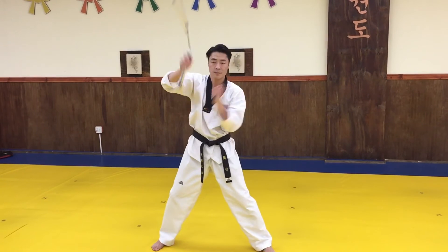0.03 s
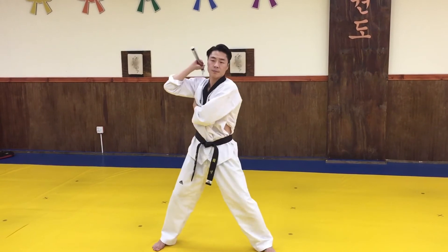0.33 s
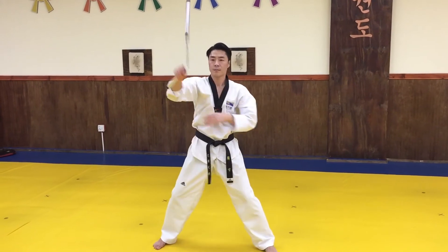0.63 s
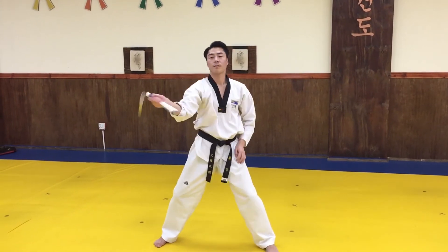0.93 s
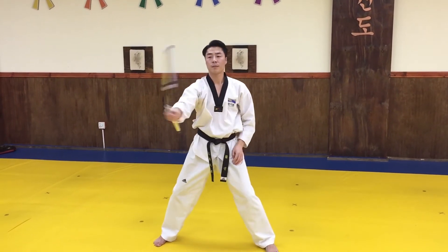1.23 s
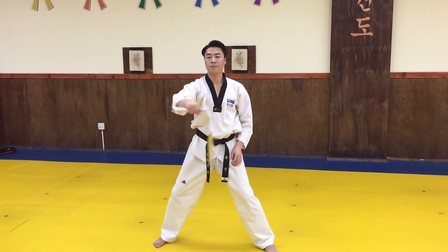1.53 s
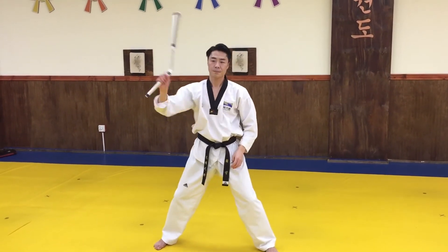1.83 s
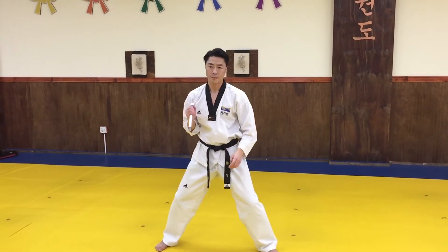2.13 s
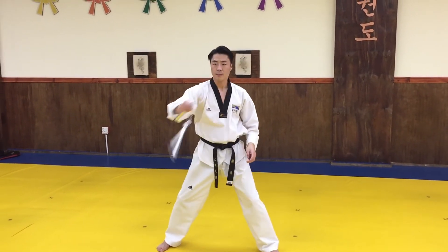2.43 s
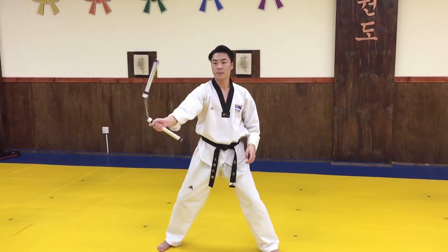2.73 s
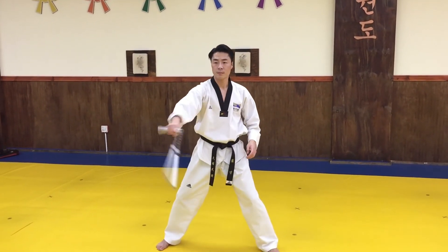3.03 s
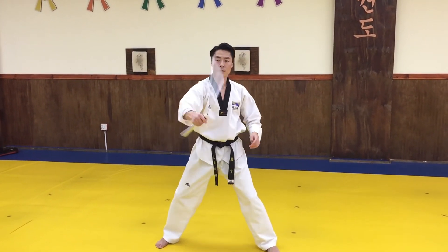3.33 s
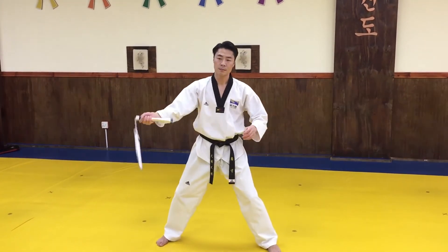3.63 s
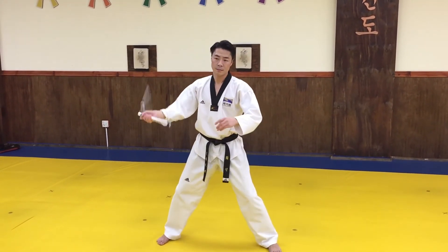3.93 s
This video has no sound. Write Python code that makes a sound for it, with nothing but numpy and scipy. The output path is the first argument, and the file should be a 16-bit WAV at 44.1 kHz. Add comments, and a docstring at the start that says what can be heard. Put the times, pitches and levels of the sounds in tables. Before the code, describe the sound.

The steel chain of swinging nunchucks rattles and clinks, with soft whooshes of air.

```python
"""Chained sticks in a training hall

Two hollow sticks joined by a steel chain are swung and spun close to one microphone. The links jingle
and snap taut against the swivel caps, and air across the flying stick hoots softly on each turn.
Twice it is caught against the uniform; cloth flaps, feet shift on the mat, and farther off
the hall answers over a low rumble."""
import sys
import numpy as np
from scipy import signal
from scipy.fft import rfft, irfft, next_fast_len
from scipy.io import wavfile
from scipy.ndimage import map_coordinates

SR = 44100
rng = np.random.default_rng(int(sys.argv[2]) if len(sys.argv) > 2 else 0)


def wrap_up_sound(samples):
    """Save the sound to the file named by the first command line argument, as 16-bit audio."""
    columns = np.atleast_2d(samples).T
    # keep every value between -1 and 1, then stretch to whole-number steps
    tamed = np.clip(columns, -1, 1)
    steps = np.round(tamed * 32767).astype(np.int16)
    wavfile.write(sys.argv[1], SR, steps)


N = 4 * SR

# the chain pulls taut: start_s, high_mode_hz, low_mode_db, high_mode_db, cap_clack_db
JERKS = [(0.001, 11710, -29, -28, -17), (0.005, 12060, -28, -28, -18), (0.071, 12330, -29, -29, -29),
         (0.125, 11570, -26, -23, -30), (0.131, 11560, -31, -25, -34), (0.308, 12060, -30, -25, -33),
         (0.737, 11900, -38, -38, -32), (0.767, 11440, -33, -30, -25), (0.774, 11510, -31, -26, -35),
         (0.848, 11600, -35, -28, -32), (0.859, 12000, -24, -33, -36), (0.948, 11570, -30, -22, -36),
         (1.163, 11520, -25, -33, -25), (1.172, 11630, -21, -24, -29), (1.183, 11610, -22, -27, -29),
         (1.198, 11540, -19, -16, -27), (1.23, 12230, -24, -29, -33), (1.393, 11630, -30, -21, -33),
         (1.409, 12200, -23, -26, -18), (1.6, 11570, -33, -24, -35), (1.715, 12100, -23, -30, -26),
         (1.808, 11490, -27, -29, -37), (2.007, 11560, -36, -30, -41), (2.036, 11730, -31, -31, -30),
         (2.059, 12170, -32, -32, -20), (2.243, 12000, -51, -47, -38), (2.286, 11900, -48, -40, -34),
         (2.435, 11800, -30, -33, -31), (2.44, 12000, -28, -29, -21), (2.51, 12200, -26, -27, -23),
         (2.615, 11760, -31, -37, -26), (2.686, 12300, -21, -30, -22), (2.723, 12300, -29, -26, -22),
         (2.88, 12100, -20, -26, -25), (2.913, 12270, -26, -24, -27), (2.964, 12100, -28, -28, -27),
         (3.059, 12420, -26, -28, -28), (3.075, 12060, -23, -31, -28), (3.1, 12440, -26, -22, -31),
         (3.213, 11710, -30, -29, -31), (3.301, 12380, -31, -22, -31), (3.332, 12170, -33, -28, -33),
         (3.395, 11620, -28, -25, -34), (3.45, 12210, -26, -29, -23), (3.458, 12300, -29, -24, -34),
         (3.497, 12020, -30, -31, -26), (3.526, 12250, -30, -26, -37), (3.631, 11520, -35, -35, -28),
         (3.7, 12120, -28, -26, -34), (3.744, 12190, -32, -29, -34), (3.87, 12200, -30, -35, -33),
         (3.964, 11700, -33, -40, -31)]
# both ends of a link's pitch range as it shifts in the chain: low_mode_hz, high_mode_hz
LINK_RANGE = [(4205, 11540), (4510, 12400)]
# spectrum of stick and swivel cap under a contact: frequency_hz, level_db
CAP_SPECTRUM = [(300, -41.5), (1300, -14), (2700, -16.5), (3700, -3), (4400, -7), (4850, 5), (5600, 1.5),
                (6350, 6.5), (7100, -2), (7950, 4), (9600, -2), (10400, -7.5), (11000, -1), (12900, 2),
                (14000, 3.5), (15700, -7)]


def amp(db):
    """Decibels to gain."""
    return 10 ** (np.asarray(db) / 20)


def unit(x):
    """Scale to rms 1."""
    return x / np.sqrt(np.mean(x ** 2) + 1e-20)


def along(points, hz):
    """Read a curve of (frequency_hz, value) points on a log frequency axis."""
    point_hz, values = np.transpose(points)
    return np.interp(np.log(hz + 1), np.log(point_hz + 1), values)


def colour(x, spectrum):
    """Causal filter with the given spectrum; white noise keeps its power."""
    size = 2 * next_fast_len(N // 2 + SR // 4)
    gain = unit(amp(along(spectrum, np.fft.rfftfreq(size, 1 / SR))))
    cepstrum = irfft(np.log(gain))
    cepstrum[1:size // 2] *= 2  # fold to minimum phase
    cepstrum[size // 2 + 1:] = 0
    return irfft(rfft(x, size) * np.exp(rfft(cepstrum)))[:N]


def add(track, start_s, sound):
    """Mix a sound in at a time."""
    part = track[max(0, int(start_s * SR)):][:len(sound)]
    part += sound[:len(part)]


def fade(t, t60):
    """Exponential decay, 60 dB down at t60."""
    return np.exp(-np.log(1000) * t / t60)


def chatter(t, rise_s):
    """Strength of one contact: the metal bites, peaks at rise_s and lets go."""
    u = t / rise_s
    return u * np.exp(1 - u)


def effort(moves):
    """Level that rises and falls in a bell curve with each movement."""
    t = np.arange(N) / SR
    return sum(amp(db) * np.exp(-.5 * ((t - peak_s) / width_s) ** 2) for peak_s, db, width_s in moves)


def swells(moves, spectrum):
    """Coloured noise that follows the movements."""
    return effort(moves) * colour(rng.standard_normal(N), spectrum)


def ring(t, hz):
    """A metal mode driven by one chattering contact; rms 1 over its first 300 samples."""
    phase = 2 * np.pi * hz * t
    slip_rad = 0.2 * np.cumsum(rng.standard_normal(len(t)))
    drive = chatter(t, rise_s=0.0013) * np.sin(phase + slip_rad)
    mode = signal.fftconvolve(drive, np.sin(phase) * fade(t, t60=0.022))[:len(t)]
    return mode / np.sqrt(np.mean(mode[:300] ** 2))


def contacts(per_s, spread_db):
    """Irregular small contacts: a time, a size and two spare random values for each."""
    contact_rng = np.random.default_rng(rng.integers(2 ** 31))
    jitter, strength, *spare = contact_rng.standard_normal((int(per_s * N / SR), 4)).T
    times = (np.arange(len(jitter)) + jitter) / per_s
    return zip(times, amp(spread_db * np.clip(strength, -2, 2)), *spare)


def ticks(spread_db):
    """A dense train of short dry ticks, rms 1."""
    t, power = np.arange(SR // 20) / SR, np.zeros(N)
    for start_s, size, _, _ in contacts(per_s=250, spread_db=spread_db):
        add(power, start_s, (size * chatter(t, rise_s=0.0022)) ** 2)
    return unit(np.sqrt(power) * rng.standard_normal(N))


def room_tone():
    """The hall's steady low rumble, with a faint hiss on top."""
    # background noise: frequency_hz, level_db
    spectrum = [(18, -16), (40, -7.5), (80, 6.5), (130, -5), (200, -10.5), (400, -18), (1000, -41),
                (4000, -19), (15000, -17.5)]
    return amp(-55) * colour(rng.standard_normal(N), spectrum)


def rattle():
    """Loose links and swivels ring, tick on the caps and scrape; link pitch drifts from jerk to jerk."""
    # loudness of the loose chain: time_s, jingle_db, scrape_db
    levels = [(0, -26, -44.5), (0.09, -27, -48), (0.199, -37, -55.5), (0.295, -37.5, -49),
              (0.33, -25.5, -62), (0.45, -38, -48), (0.57, -44.5, -60), (0.671, -28.5, -53),
              (0.76, -33, -47), (0.83, -34.5, -55.5), (0.87, -30.5, -55), (0.93, -38, -64.5),
              (1.0, -27.5, -44.5), (1.08, -39, -57.5), (1.155, -45, -64), (1.178, -23, -41),
              (1.26, -25.5, -48.5), (1.35, -37, -46.5), (1.44, -27.5, -43.5), (1.53, -39, -57),
              (1.62, -28.5, -48.5), (1.77, -30.5, -52.5), (1.83, -31.5, -45), (1.95, -40.5, -63),
              (2.0, -31.5, -53), (2.08, -32, -47), (2.19, -43.5, -53), (2.33, -45, -58),
              (2.405, -45.5, -59.5), (2.44, -25.5, -43.5), (2.6, -31.5, -46.5), (2.74, -26, -46.5),
              (2.83, -29, -47), (2.91, -24.5, -46.5), (3.1, -27.5, -44.5), (3.25, -27.5, -45.5),
              (3.52, -31, -50.5), (3.61, -38, -52.5), (3.66, -24.5, -46.5), (3.76, -28, -43),
              (3.81, -36.5, -49), (3.9, -30, -47.5), (4.0, -33.5, -46)]
    # links scraping on the stick: frequency_hz, level_db
    scrape_spectrum = [(20, -40), (150, -5.5), (750, -24.5), (1080, -0.5), (1300, -10.5), (1660, 12),
                       (1850, 5.5), (2100, 5.5), (2700, -1), (3400, 6), (9000, -20)]
    settle_s, scatter_hz, swivel_hz, detune = 0.0194, 320, 5163, 0.018
    t = np.arange(SR // 20) / SR
    low, high, swivel = np.zeros((3, N))
    low_range, high_range = np.transpose(LINK_RANGE)
    jerk_s, jerk_hz, *_ = np.transpose(JERKS)
    for k, (start_s, size, scatter, tilt) in enumerate(contacts(per_s=300, spread_db=3.5)):
        high_hz = np.interp(start_s - settle_s, jerk_s, jerk_hz) + scatter_hz * scatter
        high_hz = high_range[0] + abs(high_hz - high_range[0])  # reflect off the bottom of the range
        low_hz = np.interp(high_hz, high_range, low_range) * (1 + detune * rng.standard_normal())
        add(low, start_s, size * amp(2 * tilt) * ring(t, low_hz))
        add(high, start_s, size * amp(-2 * tilt) * ring(t, high_hz))
        if k % 2:
            add(swivel, start_s, size * ring(t, swivel_hz * (1 + detune * tilt)))
    times, *curves_db = np.transpose(levels)
    jingle_gain, scrape_gain = [amp(np.interp(np.arange(N) / SR, times, db)) for db in curves_db]
    brightness = unit(jingle_gain) ** 0.17  # gentle contacts sound duller
    metal = amp(-6) * (unit(low) + brightness * unit(high)) + amp(-14) * unit(swivel)
    cap_ticks = amp(-5.5) * colour(ticks(spread_db=5), CAP_SPECTRUM)
    scrape = amp(1) * colour(ticks(spread_db=6), scrape_spectrum)
    return jingle_gain * (metal + cap_ticks) + scrape_gain * scrape


def jerks():
    """The chain snaps taut: a cap clacks, one link rings out and sometimes the swivel too."""
    # a swivel cap rings on the hardest jerks: start_s, pitch_hz, level_db
    clinks = [(.002, 5256, -21), (1.409, 5000, -22), (1.41, 6020, -25), (1.716, 5150, -27),
              (3.45, 5230, -25)]
    t = np.arange(SR // 20) / SR
    rings, clacks = np.zeros((2, N))
    low_range, high_range = np.transpose(LINK_RANGE)
    for start_s, high_hz, low_db, high_db, clack_db in JERKS:
        low_hz = np.interp(high_hz, high_range, low_range)
        add(rings, start_s, amp(low_db - .5) * ring(t, low_hz))
        add(rings, start_s, amp(high_db + .5) * ring(t, high_hz))
        add(clacks, start_s, amp(clack_db + 3) * chatter(t, rise_s=.0016) * rng.standard_normal(len(t)))
    for start_s, hz, db in clinks:
        add(rings, start_s, amp(db) * ring(t, hz))
    return rings + colour(clacks, CAP_SPECTRUM)


def hoot():
    """Air across the hollow stick sounds a thin, wavering tone that rises with speed, in a soft whoosh."""
    # passes of the flying stick: peak_s, level_db, width_s
    swings = [(.01, -45.5, 0.043), (.75, -54.5, 0.0669), (.97, -47.5, 0.053), (1.14, -49, 0.019),
              (1.28, -53, 0.069), (1.5, -48.5, 0.046), (1.73, -46, 0.062), (1.95, -46.5, 0.0448),
              (2.54, -51, 0.0304), (2.69, -55, 0.0545), (2.89, -47, 0.05), (3.08, -45, 0.03),
              (3.3, -49, 0.023), (3.385, -47, 0.02216), (3.47, -50, 0.035), (3.69, -46, 0.03),
              (3.89, -50, 0.06)]
    # breath of the hollow stick: frequency_hz, level_db
    spectrum = [(20, -73), (200, -52.5), (440, -15), (528, 1.5), (640, -17.5), (950, -28.5), (1070, -9),
                (1160, -38), (2000, -38)]
    centre_hz, rise_hz, waver_hz, wavers_per_s = 529, 29.84, 10, 40
    waver = map_coordinates(rng.standard_normal(N // 100), [np.arange(N) * wavers_per_s / SR])
    speed = effort(swings)
    hz = centre_hz + rise_hz * (speed / speed.max() - .5) + waver_hz * waver
    tone = np.sqrt(2) * np.sin(2 * np.pi * np.cumsum(hz) / SR)
    return amp(-5.5) * speed * tone + amp(-4) * swells(swings, spectrum)


def snaps():
    """Steel strikes steel: a short burst of pure treble."""
    # bright snaps of the chain: start_s, level_db
    strikes = [(.126, -16), (.593, -27), (.768, -18), (1.198, -16), (1.411, -15), (1.717, -14),
               (2.286, -24), (2.44, -16), (2.512, -18), (2.724, -17), (3.101, -17), (3.157, -22),
               (3.214, -15), (3.365, -22), (3.451, -15), (3.745, -17)]
    t, bursts = np.arange(SR // 20) / SR, np.zeros(N)
    for start_s, db in strikes:
        add(bursts, start_s, amp(db) * fade(t, t60=0.03) * rng.standard_normal(len(t)))
    return signal.sosfilt(signal.butter(2, 11000, "high", fs=SR, output="sos"), bursts)


def catches():
    """The stick is caught with a soft slap that dies in the cloth."""
    # stick landing on the uniform: start_s, level_db, t60_s
    landings = [(0.306, -42.5, 0.28), (2.037, -30, 0.17), (2.059, -32.5, 0.32)]
    # slap on cloth: frequency_hz, level_db
    spectrum = [(30, -22), (70, -6), (330, -8.5), (900, -8), (1620, -4), (2800, -12), (14000, -14)]
    t, slaps = np.arange(SR // 2) / SR, np.zeros(N)
    for start_s, db, t60 in landings:
        add(slaps, start_s, amp(db) * fade(t, t60) * rng.standard_normal(len(t)))
    return colour(slaps, spectrum)


def uniform_flaps():
    """The uniform flaps in low, soft puffs."""
    # flaps: peak_s, level_db, width_s
    flaps = [(.34, -52.5, 0.023), (.52, -58.5, 0.13), (3.45, -59, 0.11)]
    # moving cloth: frequency_hz, level_db
    spectrum = [(180, -31), (245, 24), (340, 6.5), (600, -2), (2000, -50)]
    return swells(flaps, spectrum)


def sleeve_slides():
    """The stick rubs along the sleeve with a narrow hiss."""
    # slides: peak_s, level_db, width_s
    slides = [(.385, -36, 0.044), (.86, -42, 0.011), (2.44, -37.5, 0.011)]
    # sleeve friction: frequency_hz, level_db
    spectrum = [(20, -34), (200, -17), (800, -28), (1560, -9), (1690, 7), (1830, -8.5), (5000, -34)]
    return swells(slides, spectrum)


def swish():
    """Air swishes as the stick is flung out."""
    # the fling: peak_s, level_db, width_s
    fling = [(.745, -48, 0.04)]
    # rushing air: frequency_hz, level_db
    spectrum = [(250, -36), (580, 17.5), (850, -5), (1100, 12), (2000, -40)]
    return swells(fling, spectrum)


def steps():
    """Shifts of weight thud dully on the mat."""
    # weight shifts: peak_s, level_db, width_s
    shifts = [(.82, -52.5, 0.035), (1.82, -53.5, 0.04), (2.45, -48.5, 0.038)]
    # mat underfoot: frequency_hz, level_db
    spectrum = [(40, -36), (75, 4.5), (140, 13), (190, -15), (400, -47)]
    return swells(shifts, spectrum)


def knocks():
    """Duller knocks of one stick on the other or on a hand."""
    # stick knocking on stick or hand: start_s, level_db
    hits = [(1, -38), (1.167, -29), (1.445, -35.5), (1.823, -33.5), (2.431, -32.5), (2.705, -30.5),
            (3.0, -30), (3.099, -28.5), (3.3, -32.5), (3.336, -34), (3.42, -36.5)]
    # struck stick: frequency_hz, level_db
    spectrum = [(20, -50), (200, -26), (800, -19), (1300, -8), (1750, 2), (2200, 0), (3400, -1), (5000, -5),
                (10000, -14)]
    t, blows = np.arange(SR // 20) / SR, np.zeros(N)
    for start_s, db in hits:
        add(blows, start_s, amp(db) * chatter(t, rise_s=.0025) * rng.standard_normal(len(t)))
    return colour(blows, spectrum)


def hall(near, pieces=24, delay_s=.006):
    """The hall answers each stretch of movement with a fresh noise tail; its top treble dies first."""
    # reverberation time: frequency_hz, t60_s
    decay = [(100, 0.83), (1000, 0.5), (4500, 0.62), (16000, 0.31)]
    reverb = np.zeros(N)
    for piece in np.array_split(np.arange(N), pieces):
        hz, t, bands = signal.stft(rng.standard_normal(SR // 2), SR, nperseg=256)
        _, tail = signal.istft(bands * fade(t, along(decay, hz)[:, None]), SR, nperseg=256)
        tail /= np.linalg.norm(tail)
        add(reverb, piece[0] / SR + delay_s, signal.fftconvolve(near[piece], tail))
    return reverb


def scene():
    """Chain and sticks up close with the hall behind them; steps, flaps and swish stay dry. Mono."""
    near = rattle() + jerks() + snaps() + knocks() + catches() + hoot() + sleeve_slides()
    body = steps() + uniform_flaps() + swish()
    rumble = room_tone()
    return (near + amp(-6.5) * hall(near) + body + rumble)[None]


def record(dry):
    """The microphone passes nothing above its band limit."""
    top_hz, size = 15900, next_fast_len(N + SR // 2)
    in_band = np.fft.rfftfreq(size, 1 / SR) < top_hz
    return irfft(rfft(dry, size) * in_band, size)[..., :N]


dry = scene()
out = record(dry)
wrap_up_sound(out)
```